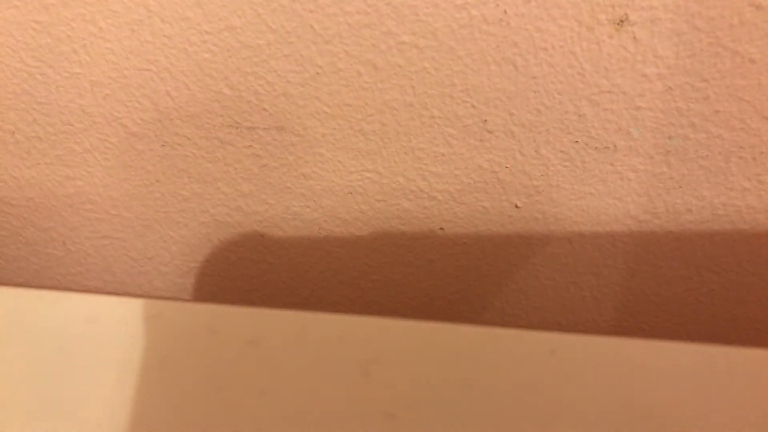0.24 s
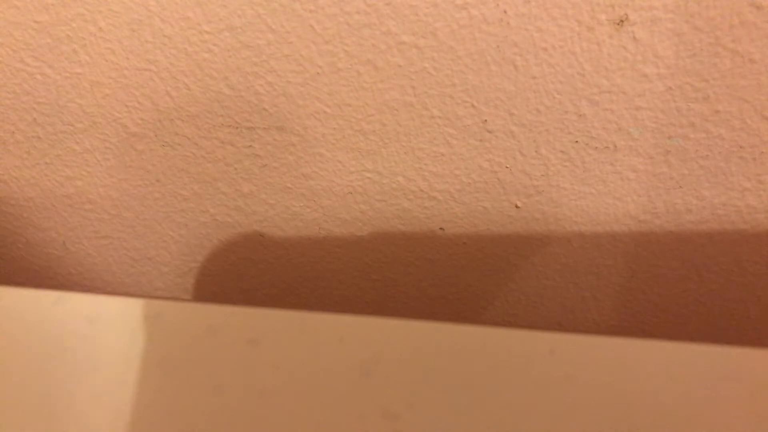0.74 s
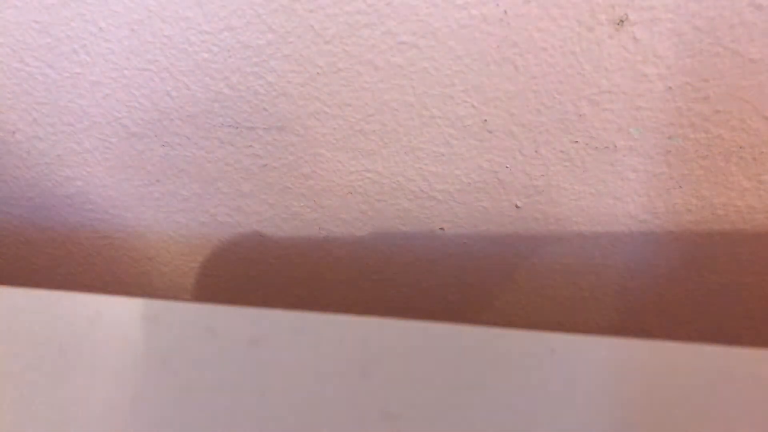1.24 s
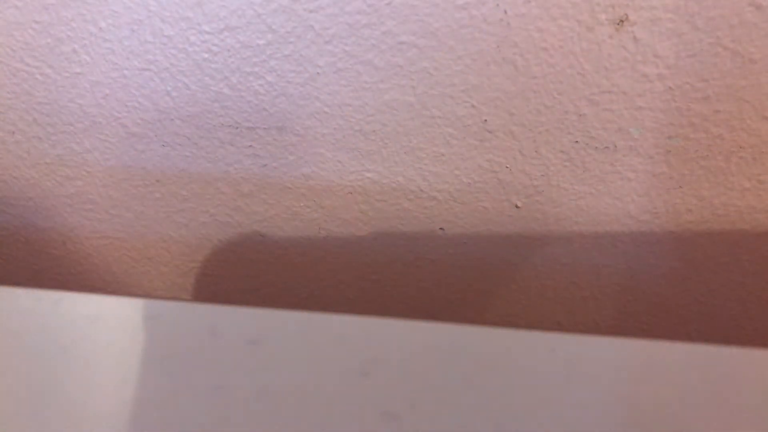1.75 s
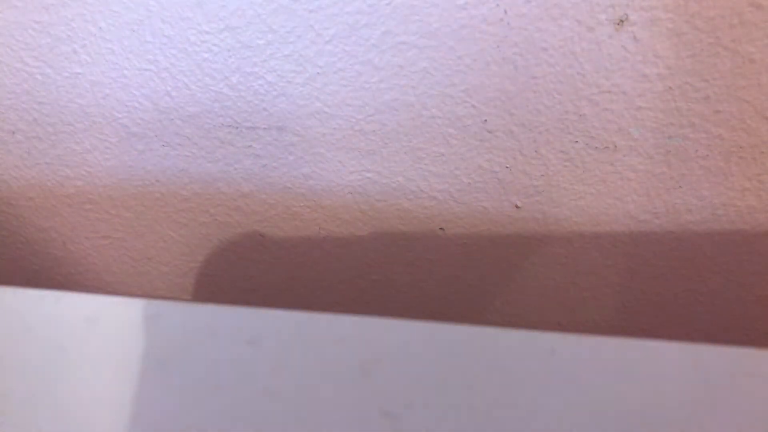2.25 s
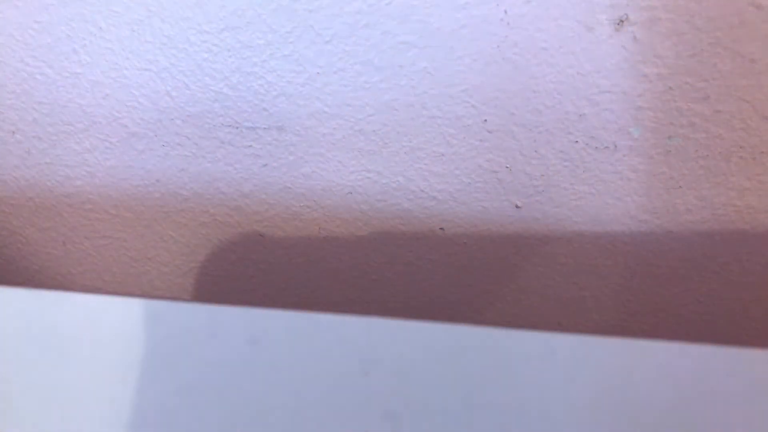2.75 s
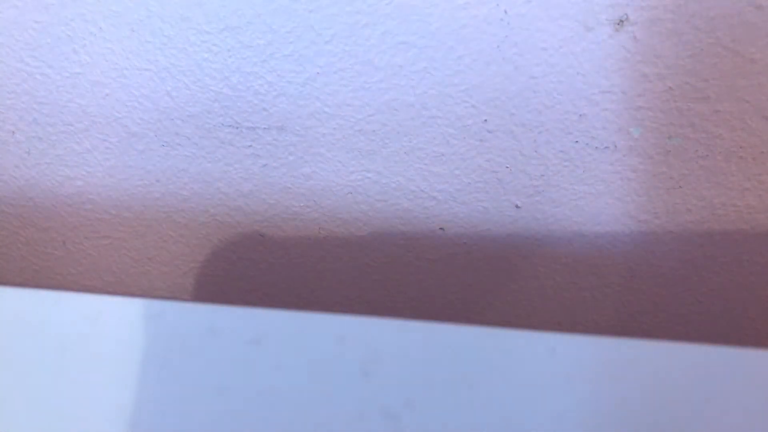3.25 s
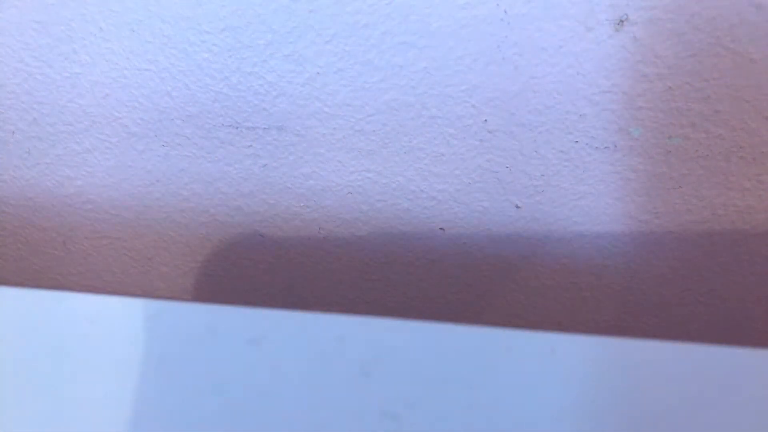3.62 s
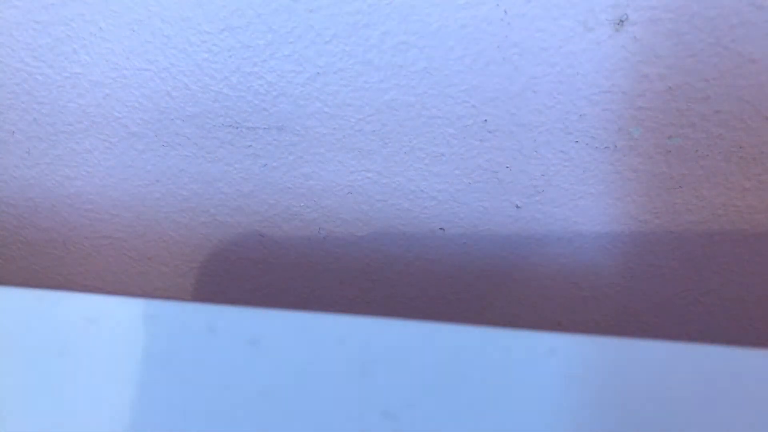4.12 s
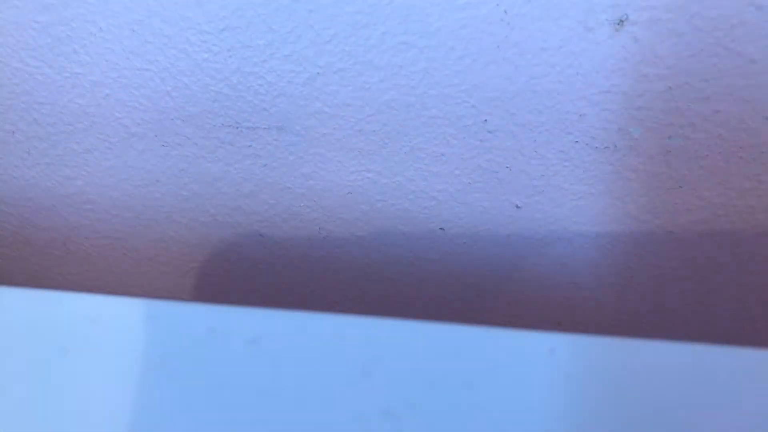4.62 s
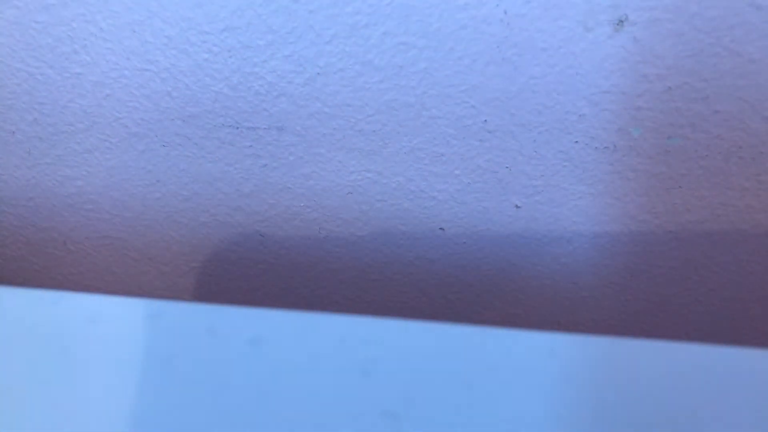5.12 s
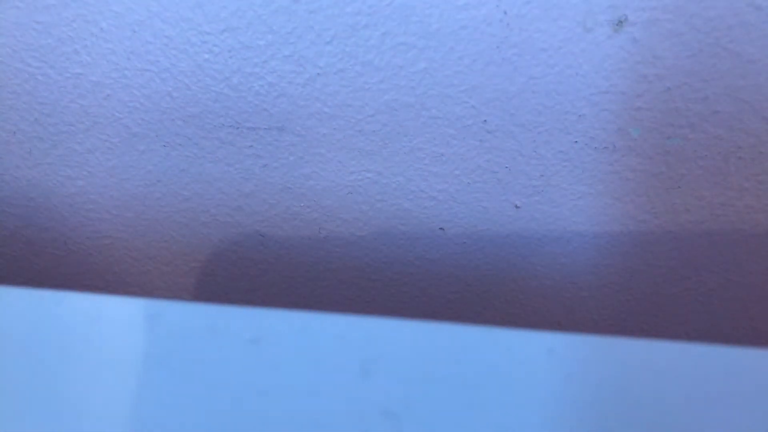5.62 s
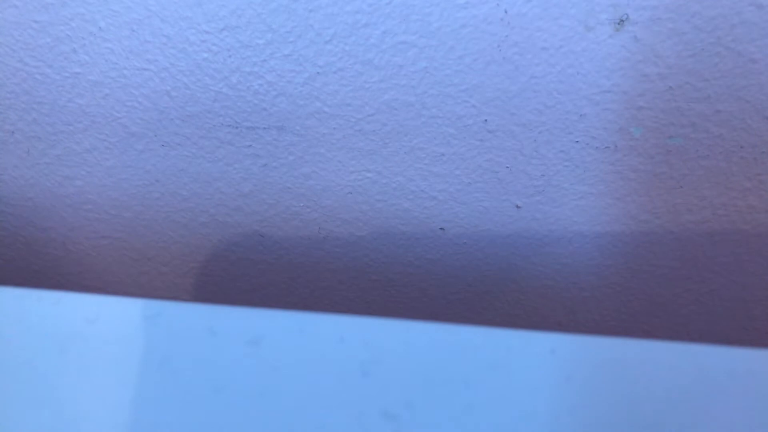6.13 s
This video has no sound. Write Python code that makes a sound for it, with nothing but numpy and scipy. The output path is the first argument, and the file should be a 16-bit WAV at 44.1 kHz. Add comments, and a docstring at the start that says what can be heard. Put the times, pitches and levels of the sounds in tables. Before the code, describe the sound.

In a quiet bedroom, a small click releases a cord lock. After a short pause, a window blind is raised hand over hand: regular rasping pulls, each swelling quickly and easing off, with fibrous hiss, a low roller drone and little creaks. Plastic clacks and soft low bumps join in. Close mono pickup, short room tail, faint air murmur.

```python
"""A click, then fourteen rasping pulls on a cord as a window blind is raised hand over hand in a bedroom.
The braided cord catches and slips in its lock, which makes the headrail ring; its fibres hiss in the guides.
The small guide chatters, the roller drones at a pitch that follows the cord speed, and short tones creak.
Plastic parts click as short bursts of chatter, and the swinging blind bumps as soft low swells.
Most sounds leave a short room tail, over a faint steady murmur of air."""
import sys
import numpy as np
from scipy import signal
from scipy.fft import rfft, irfft
from scipy.io import wavfile
from scipy.ndimage import uniform_filter1d

SR = 44100
rng = np.random.default_rng(int(sys.argv[2]) if len(sys.argv) > 2 else 0)


def output_pcm(signal):
    """Save a mono or channel-first signal as 16-bit PCM at the path in sys.argv[1].

    Samples are clipped to [-1, 1] before scaling.
    """
    pcm = np.clip(np.atleast_2d(signal).T, -1, 1) * 32767
    wavfile.write(sys.argv[1], SR, np.round(pcm).astype(np.int16))


N = 280917
T = np.arange(N) / SR  # time in seconds

# Tone of the still air. Each row: frequency in Hz, relative level in dB.
AIR_COLOUR = [(15, -25), (25, -19), (55, 4.5), (92, -6.5), (137, -2.5), (277, -9), (373, -10), (560, -17.5),
              (911, -17), (2110, -24.5), (6050, -27.5), (14400, -39.5), (16000, -35)]
# Ringing of the lock as it springs open. Each row: frequency in Hz, width in Hz, height above the colour in dB.
LOCK_RESONANCES = [(337, 150, 13), (1530, 84, 18), (1750, 110, 15), (2330, 140, 8), (3390, 90, 13),
                   (3760, 140, 13), (4300, 120, 6), (5460, 150, 12), (6060, 130, 8), (6670, 110, 9),
                   (6600, 83, 16), (9500, 120, 9), (12400, 500, 8), (14450, 300, 16)]
# Broad tone of the lock. Each row: frequency in Hz, relative level in dB.
LOCK_COLOUR = [(100, 3), (500, -3.5), (850, -13), (1300, -2), (3000, 0.5), (5500, 2.5), (8500, -0.5),
               (10300, -11), (11500, -7), (16000, -7)]
# The cord snaps taut against the small guide. Each row: start in seconds, relative strength in dB.
GUIDE_TAPS = [(0.799, -47), (0.88, -38), (0.932, -38), (1.686, -39), (1.736, -30), (2.076, -41.5),
              (2.431, -36), (2.467, -31), (2.535, -28.5), (3.581, -34.5), (3.877, -41.5), (3.907, -39),
              (3.942, -33.5), (4.469, -28.5), (4.865, -24), (5.276, -33), (6.014, -41), (6.044, -38)]
# One pull per hand. Each row: taking hold in seconds, fastest moment in seconds, start below the peak in dB,
# end below the peak in dB, relative rasp peak in dB, relative hiss peak in dB,
# centre of the roller's drone in seconds, relative drone strength in dB.
PULLS = [(.805, 1.063, 9, 19.5, -38.5, -46, 1.33, -40), (1.249, 1.458, 12.5, 23.5, -33, -38.5, 1.53, -42),
         (1.677, 1.862, 17.5, 20, -31.5, -37, 2, -48), (2.073, 2.224, 17, 14, -34.5, -37.5, 2.3, -51),
         (2.43, 2.63, 14.5, 17.5, -33.5, -37.5, 2.6, -33.5), (2.816, 2.949, 15, 16, -32, -37.5, 2.96, -38),
         (3.128, 3.358, 17, 15.5, -32, -36.5, 3.41, -33.5), (3.543, 3.731, 10, 19, -32.5, -36, 3.57, -37),
         (3.933, 4.131, 17.5, 18.5, -32, -32.5, 4.76, -42), (4.338, 4.572, 12.5, 21, -33, -35.5, 4.53, -35),
         (4.752, 4.955, 22.5, 21.5, -31.5, -33.5, 5.03, -32.5),
         (5.181, 5.373, 15, 22.5, -33, -34, 5.33, -33), (5.597, 5.821, 10, 20, -34, -33.5, 5.78, -31.5),
         (6.018, 6.287, 15, 15, -33, -37.5, 6.26, -28.5)]
# The cord briefly scrapes harder, or lighter if negative. Each row: centre in seconds, change in dB,
# time from the centre until 37 percent of the change is left, in seconds.
GRABS = [(0.813, 3, 0.011), (0.85, -3, 0.0086), (0.916, 4.5, 0.019), (2.49, 3, 0.0099), (2.583, 3.5, 0.017),
         (2.907, 3, 0.0091), (6.273, 3.5, 0.012)]
# Ringing of the headrail. Each row: frequency in Hz, width in Hz, height above the colour in dB.
RAIL_RESONANCES = [(71.6, 4.7, 15.5), (134, 14.5, 17), (182, 15, 7), (197, 8, 2), (233.5, 23.3, 14),
                   (303.3, 20, 12.5), (371, 19, 14), (433, 16.7, 12), (482, 36, 4.5), (628, 56, 5.5),
                   (1190, 46, 2.5), (1383, 106, 6.5), (1606, 28, 5), (2090, 38, 6.5), (2614, 190, 4.5),
                   (3867, 42, 10), (4326, 160, 8), (4670, 48, 11)]
# Broad tone of the rasp. Each row: frequency in Hz, relative level in dB.
RASP_COLOUR = [(30, -8), (60, -23), (100, -10.5), (170, -9.5), (260, 0), (335, -4), (500, 0), (800, -5),
               (1100, -1.5), (1700, -3.5), (2400, -9), (3400, -6), (5000, -13), (9000, -15.5), (16000, -11)]
# Broad tone of the fibre hiss. Each row: frequency in Hz, relative level in dB.
HISS_COLOUR = [(300, -37), (2000, -3), (4000, 2), (4950, 4), (6600, 20.5), (7600, 15), (8000, 18.5),
               (8400, 15), (9500, 7), (9900, 17), (10450, 4), (11000, 18), (11900, 14.5), (12700, 14),
               (16000, 10.5)]
# Short creaks of the cord. Each row: centre in seconds, pitch in Hz, relative strength in dB,
# spread of the bell-shaped swell in seconds.
CREAKS = [(1.094, 290.5, -43.5, 0.061), (1.366, 2080, -39, 0.026), (1.824, 2070, -38, 0.027),
          (2.248, 385, -30, 0.012), (2.305, 378, -37, 0.028), (3.32, 1457, -37, 0.081),
          (6.241, 1150, -40, .03), (6.278, 2048, -36, 0.02)]
# Soft bumps of the swinging blind. Each row: start in seconds, peak level in dB, pitch in Hz.
BUMPS = [(1.12, -52.5, 73), (1.5, -41, 71.7), (1.939, -53, 57.4), (2.73, -51, 74.4), (3.365, -38, 133.3),
         (3.43, -46, 72.3), (4.29, -61, 71), (6.282, -45, 70)]
# Knocks of the lock and toggle. Each row: start in seconds, relative strength in dB,
# body below 2.4 kHz against the middle in dB, treble above 10 kHz against the middle in dB,
# chatter time in seconds.
CLICKS = [(1.246, -40, 4, -1, .006), (1.273, -32, 6, -3, .003), (1.411, -21, 3, -0.5, 0.0056),
          (2.340, -25, 7, 0, 0.0014), (2.384, -26.5, 8, 3, 0.004), (2.438, -33, -8, 2, .003),
          (3.015, -25, 6, 1, 0.0032), (3.102, -24.5, 1, 1, 0.0052), (3.233, -30, -23, -4, .004),
          (3.307, -20.5, 5, 2, 0.0067), (3.389, -32, 3, 4, 0.0035), (3.409, -26, 11, -2, .004),
          (3.476, -31.5, 8, -2, .005), (4.067, -19, 1, 3.5, 0.0074), (4.23, -31, -3, 4, 0.0046),
          (4.263, -24, 6, 2.5, .004), (4.753, -39.5, -4, 4, 0.0054), (4.815, -29, -12, 2, 0.008),
          (4.888, -19.5, 11.5, 4, 0.0061), (5.067, -26, 5.5, -1.5, 0.0047), (5.247, -27, 0, -2, 0.0038),
          (5.526, -38.5, 5, -10, 0.0042), (5.601, -29, 6, 2, 0.0037), (5.912, -32, 5, 0, .004),
          (6.044, -37, 3, 4, 0.0043)]
# Broad tone of the knocks. Each row: frequency in Hz, relative level in dB.
CLICK_COLOUR = [(40, -63), (140, -3), (400, -4.5), (800, -30), (1300, -21), (1950, 1), (3000, 0), (3700, 2),
                (4900, 3), (5600, 5), (6700, 7), (8000, 2.5), (9500, -2.5), (12500, -2), (16000, -2.5)]


def undb(db):
    """Turn decibels into a gain."""
    return 10 ** (np.asarray(db) / 20)


def unit(x):
    """Scale a sound to an average (rms) level of 1."""
    return x / np.sqrt(np.mean(x ** 2))


def walk(rate):
    """Draw random values, rate per second, and join them with straight lines."""
    return np.interp(T * rate, np.arange(N // 8), rng.standard_normal(N // 8))


def band(x, lo_hz, hi_hz, order=2):
    """Keep only the frequencies between two limits."""
    return signal.sosfilt(signal.butter(order, [lo_hz, hi_hz], "band", fs=SR, output="sos"), x)


def ring(x, colour, resonances=(), size=16384):
    """Pass a sound through a body: a broad colour with resonances on top, ringing only after each push."""
    hz = np.maximum(np.arange(size // 2 + 1) * SR / size, 1)
    points, colour_db = np.transpose(colour)
    power = undb(np.interp(np.log(hz), np.log(points), colour_db)) ** 2
    peaks = 1
    for centre, width, height_db in resonances:
        extra_power = max(undb(height_db) ** 2 - 1, 0)
        peaks = peaks + extra_power / (1 + (2 * (hz - centre) / width) ** 2)
    power = power * peaks
    # folding the cepstrum (spectrum of the log spectrum) makes the response start at once
    cepstrum = irfft(np.log(power / power.mean()) / 2)
    cepstrum[1:size // 2] *= 2
    cepstrum[size // 2 + 1:] = 0
    response = irfft(np.exp(rfft(cepstrum)))
    return signal.fftconvolve(x, response)[:len(x)]


def contact(chatter_s, fade_s, attack_s=0.00052):
    """Plastic parts meet, chatter for a few milliseconds and settle."""
    age = T[:SR // 10]
    attack = np.minimum(age / attack_s, 1)
    fade = np.exp(-np.maximum(age - chatter_s, 0) / fade_s)
    return rng.choice([-1, 1], len(age)) * attack * fade


def place(x, start_s):
    """Set a short sound at a given time in silence."""
    return np.pad(x, (int(start_s * SR), N))[:N]


def slips(rate, spread_db):
    """Fibres catch and let go at random, rate times a second, each with its own strength."""
    chance, size, sign = rng.random(N), rng.standard_normal(N), rng.choice([-1, 1], N)
    strength = undb(spread_db * np.minimum(size, 1))  # the strongest slips are capped
    happens = chance < rate / SR
    # dividing by the root of the rate keeps denser slips from growing louder
    return unit(happens * sign * strength / np.sqrt(rate))


def air():
    """Still room: a smooth faint hiss over an uneven low murmur."""
    noise = rng.standard_normal(N)
    murmur_change = undb(0.85 * walk(19)) - 1
    noise = noise + murmur_change * band(noise, 50, 600, order=1)
    return ring(noise, AIR_COLOUR) * undb(-63)


def grip(start_s, level_db, fade_s=0.083):
    """A dull touch as the hand takes hold of the cord: noise that starts at once and fades."""
    touch = rng.standard_normal(N) * (T > start_s) * np.exp(-np.abs(T - start_s) / fade_s)
    colour = [(100, -22), (250, 0), (420, 1), (650, -15), (1200, -23), (4000, -37)]
    return ring(touch, colour) * undb(level_db)


def release(start_s=.173, strength_db=-33):
    """The lock springs open; its own ring is heard directly, the room scatters the broad crack."""
    snap = place(contact(chatter_s=0.0025, fade_s=0.0059), start_s) * undb(strength_db)
    direct = ring(snap, LOCK_COLOUR, LOCK_RESONANCES)
    crack = ring(snap, LOCK_COLOUR, [(1680, 450, 8.3), (3800, 700, 3)])
    return direct + bedroom(crack, wet_db=-5.0)


def bedroom(x, wet_db, t60=0.39, treble_t60=0.23, build_s=0.016):
    """The room's answer: reflections thicken over the first moments; the treble dies first."""
    age = T[:SR // 2]
    noise = rng.standard_normal((2, len(age)))
    # each t60 is the time in seconds for a fall of 60 dB
    body = band(noise[0], 337, 5900) * undb(-60 * age / t60)
    treble = undb(0.5) * band(noise[1], 6200, 19400) * undb(-60 * age / treble_t60)
    tail = (body + treble) * np.minimum(age / build_s, 1) ** 2
    tail = tail / np.sqrt(np.sum(tail ** 2))
    return undb(wet_db) * signal.fftconvolve(x, tail)[:N]


def guide(level_db):
    """The small guide chatters and snaps against the cord with a short bright ring."""
    chatter = slips(700, spread_db=3) * undb(level_db - 4)
    for start_s, strength_db in GUIDE_TAPS:
        tap = contact(chatter_s=.002, fade_s=.002)
        chatter = chatter + place(tap, start_s) * undb(strength_db)
    colour = [(500, -32), (3000, -24), (4500, -9.5), (5450, -6.5), (6200, -6.0), (8000, -27.0), (16000, -21)]
    return ring(chatter, colour, [(5476, 260, 10.4)])


def eased(db, handover_s=0.023):
    """Blend a level curve over the time the next hand needs to bring the cord taut."""
    smooth = uniform_filter1d(undb(db), int(handover_s * SR))
    return 20 * np.log10(np.maximum(smooth, 1e-6))


def pulls():
    """Each hand speeds the cord up, then lets it slow; gives the tug and the levels of its four sounds."""
    rise_power, fall_power = 2.4, 1.1  # the hand speeds up quickly, levels off, then slows almost evenly
    hiss_growth, guide_growth, drone_growth = 1.01, 1.0, 0.56  # dB gained per dB of rasp
    # a slackening cord loses its treble first: extra dB lost per dB of slowing
    slack_power, hiss_slack, guide_slack = 2.3, 1, 0.65
    guide_peak_db, guide_lead_s = -35, 0.02  # the guide chatters most just before the cord is fastest
    drone_spread_s, idle_peak_db = 0.033, -39  # the roller's swell, and its level for the rest of a pull
    rasp_db, hiss_db, idle_db = np.full((3, N), -100.)
    tug, swell, slack_db = np.zeros((3, N))
    ends = [row[0] for row in PULLS[1:]] + [N / SR]
    for row, end in zip(PULLS, ends):
        start, fastest, catch_db, end_db, rasp_peak_db, hiss_peak_db, drone_s, drone_db = row
        now = (T >= start) & (T < end)
        rise = np.clip((fastest - T[now]) / (fastest - start), 0, 1)  # 1 at the catch, 0 when fastest
        fall = np.clip((T[now] - fastest) / (end - fastest), 0, 1)  # 0 when fastest, 1 at the end
        effort_db = -catch_db * rise ** rise_power - end_db * fall ** fall_power
        tug[now] = rise
        slack_db[now] = end_db * fall ** slack_power
        rasp_db[now] = rasp_peak_db + effort_db
        hiss_db[now] = hiss_peak_db + hiss_growth * effort_db
        idle_db[now] = idle_peak_db + drone_growth * effort_db
        swell += undb(drone_db) * np.exp(-((T - drone_s) / drone_spread_s) ** 2 / 2)
    ahead_db = np.where(T < PULLS[0][0], rasp_db, np.interp(T + guide_lead_s, T, rasp_db))
    guide_db = guide_peak_db + guide_growth * (ahead_db - rasp_db.max())
    hiss_db = eased(hiss_db - hiss_slack * slack_db)
    guide_db = eased(guide_db - guide_slack * slack_db)
    roller_db = 20 * np.log10(swell + undb(eased(idle_db)))
    return tug, eased(rasp_db), hiss_db, guide_db, roller_db


def wander(x, spread_db, rate, count=9):
    """The point of contact shifts, so neighbouring bands flicker in level above the steadier low body."""
    out, below = x, 0
    for hz in np.geomspace(280, 9000, count):
        low = signal.sosfiltfilt(signal.butter(4, hz, fs=SR, output="sos"), x)
        depth_db = spread_db * min(hz / 1000, 1)  # low bands move less
        change = undb(depth_db * walk(rate)) - 1
        out = out + (low - below) * change
        below = low
    return out


def rasp(speed, tug, level_db):
    """The cord drags through the lock; its slips come denser with speed and shake the headrail."""
    grab_db = sum(db * np.exp(-((T - s) / length) ** 2) for s, db, length in GRABS)
    scrape = slips(600 + 3200 * speed, spread_db=0.0)
    scrape = scrape * undb(level_db + 1.0 + grab_db + walk(110))
    # a hard-pulled cord bites brighter
    scrape = scrape + 0.76 * speed * band(scrape, 1310, 3060, order=1)
    # a fresh tug shakes the low body of the headrail
    scrape = scrape + .55 * (tug - .25) * band(scrape, 250, 554, order=1)
    scrape = wander(scrape, spread_db=2, rate=14)
    return ring(band(scrape, 41, 10140, order=3), RASP_COLOUR, RAIL_RESONANCES)


def hiss(speed, level_db):
    """Fine fibres brush the guide holes, more densely at speed."""
    flutter = undb(1.6 * walk(170))
    brush = slips(600 + 4000 * speed, spread_db=7) * flutter
    return ring(brush * undb(level_db - 5.5), HISS_COLOUR)


def roller(speed, level_db, top_hz=243):
    """The braid bumps over the roller: an unsteady drone that rises with the speed of the cord."""
    hz = top_hz * (.6 + .4 * speed) * (1 + 0.0764 * walk(170))
    phase = 2 * np.pi * np.cumsum(hz) / SR
    throb = undb(1.6 * walk(110))
    drone = (np.sin(phase) + undb(-16.5) * np.sin(2 * phase)) * throb
    return unit(drone) * speed * undb(level_db - 3.0)


def creaks(unsteady=0.0258):
    """Stick and slip fall briefly into step with a resonance and give a rough tone."""
    out = np.zeros(N)
    for centre_s, hz, strength_db, spread_s in CREAKS:
        phase = 2 * np.pi * np.cumsum(hz * (1 + unsteady * walk(hz / 4))) / SR
        roughness = undb(strength_db + 1.0 + 2 * walk(200))
        out += np.sin(phase) * roughness * np.exp(-((T - centre_s) / spread_s) ** 2 / 2)
    return out


def bumps(swell_cycles=4.0):
    """The blind swings into the window recess, which booms slowly: a low tone swells and fades."""
    out = np.zeros(N)
    for start_s, peak_db, hz in BUMPS:
        cycles = np.maximum(T - start_s, 0) * hz
        rise = cycles / swell_cycles
        swell = (rise * np.exp(1 - rise)) ** 2
        out += undb(peak_db) * swell * np.sin(2 * np.pi * cycles)
    return out


def clicks():
    """The lock pawl and toggle knock: each short chatter has its own balance of body and treble."""
    out = np.zeros(N)
    for start_s, strength_db, body_db, treble_db, chatter_s in CLICKS:
        tone = [(500, body_db), (2400, body_db), (4000, 0), (7000, 0), (10000, treble_db)]
        knock = contact(chatter_s, fade_s=0.0059, attack_s=0.22 * chatter_s)
        out += place(ring(knock, tone, size=1024), start_s) * undb(strength_db - 4)
    return ring(out, CLICK_COLOUR)


def scene():
    """The cord, the knocking parts and the swinging blind in their room."""
    tug, rasp_db, hiss_db, guide_db, roller_db = pulls()
    # friction grows with speed, so a louder rasp means a faster cord (1 is full speed)
    speed = np.clip(undb(.6 * (rasp_db + 32)), .05, 1)
    touches = grip(start_s=.116, level_db=-53) + grip(start_s=0.6, level_db=-62)
    rubbing = guide(guide_db) + rasp(speed, tug, rasp_db) + hiss(speed, hiss_db)
    cord = touches + rubbing + roller(speed, roller_db) + creaks()
    knocks = clicks()
    room = bedroom(cord, wet_db=-12) + bedroom(knocks, wet_db=-6.5)
    return (air() + release() + cord + bumps() + knocks + room)[None]


def record(dry):
    """Filters weaken the deep bass below 38 Hz and cut steeply above 15.9 kHz."""
    low_cut = signal.butter(4, 38, "high", fs=SR, output="sos")
    top_cut = signal.ellip(10, .2, 70, 15900, fs=SR, output="sos")
    return signal.sosfilt(top_cut, signal.sosfilt(low_cut, dry))


dry = scene()
out = record(dry)
output_pcm(out)
```